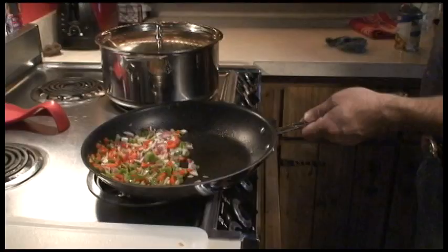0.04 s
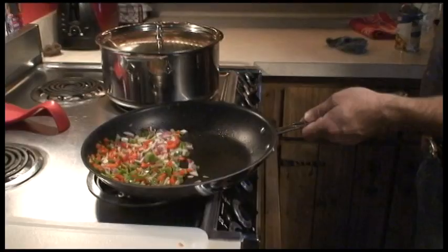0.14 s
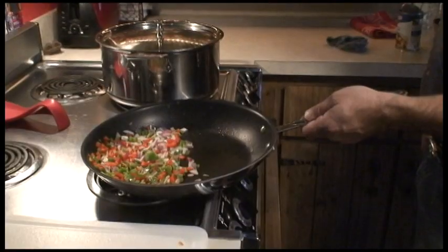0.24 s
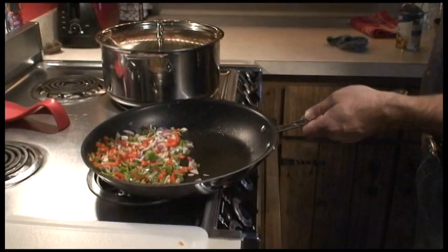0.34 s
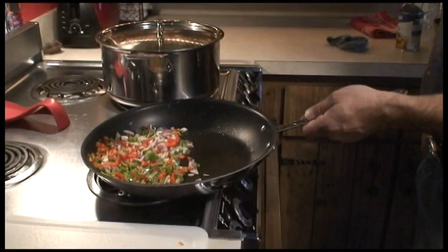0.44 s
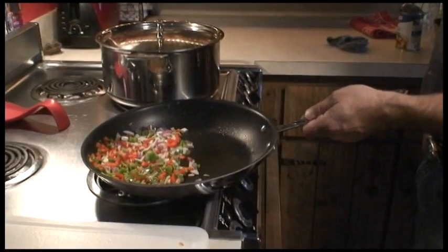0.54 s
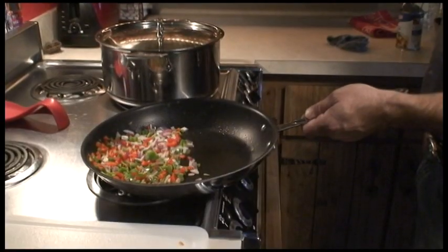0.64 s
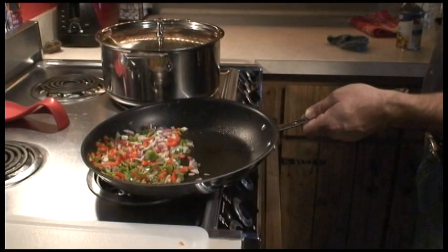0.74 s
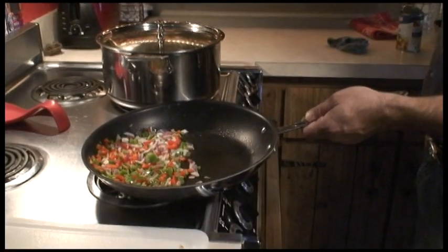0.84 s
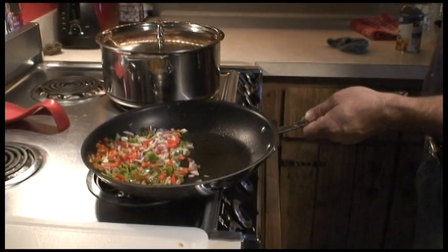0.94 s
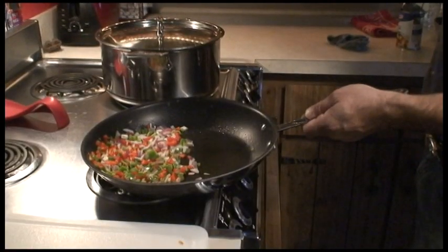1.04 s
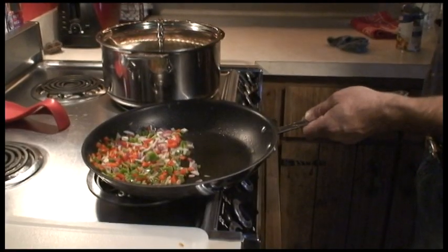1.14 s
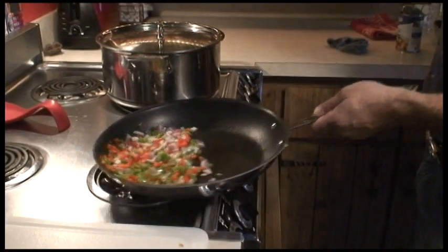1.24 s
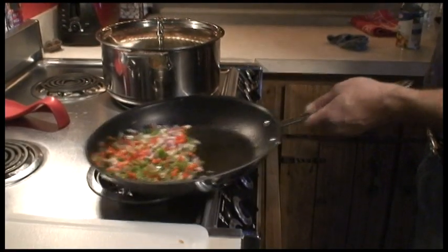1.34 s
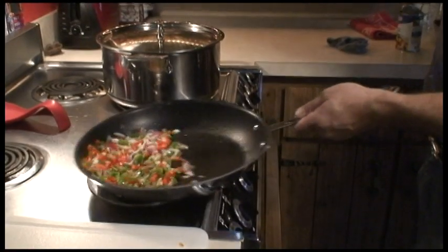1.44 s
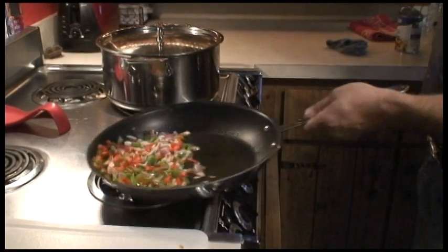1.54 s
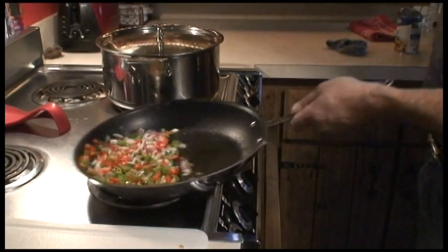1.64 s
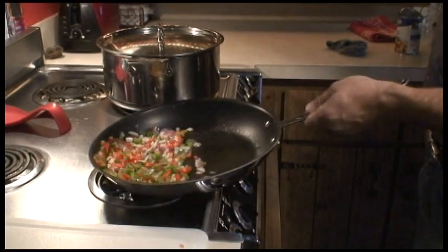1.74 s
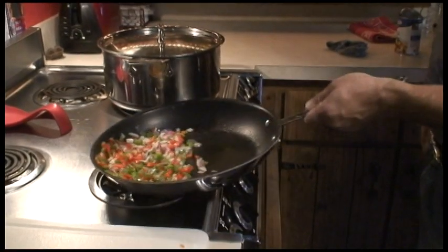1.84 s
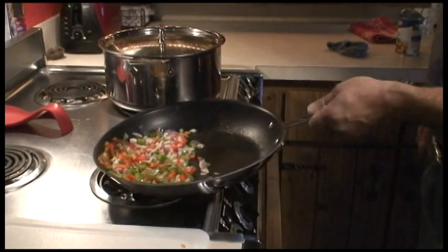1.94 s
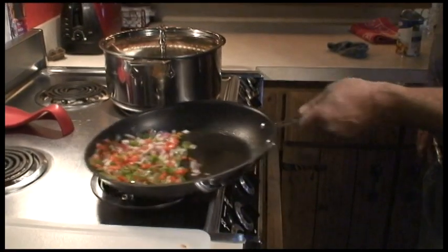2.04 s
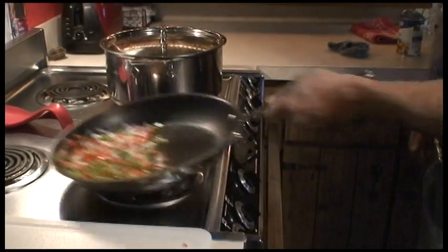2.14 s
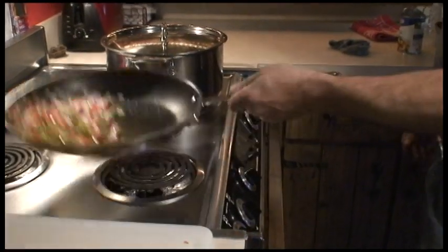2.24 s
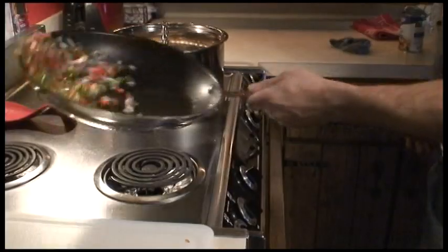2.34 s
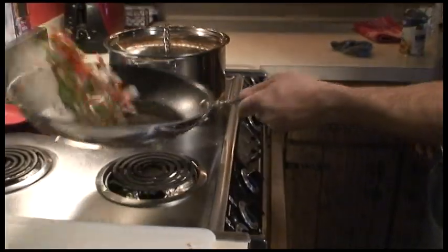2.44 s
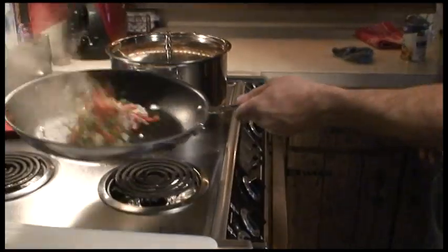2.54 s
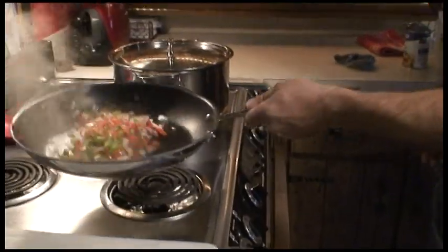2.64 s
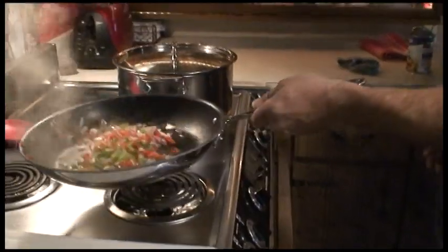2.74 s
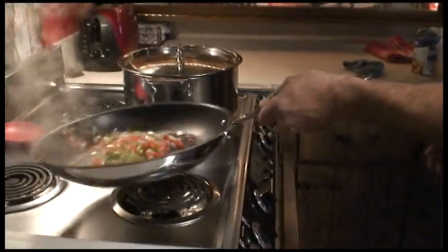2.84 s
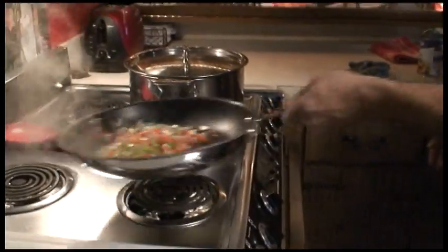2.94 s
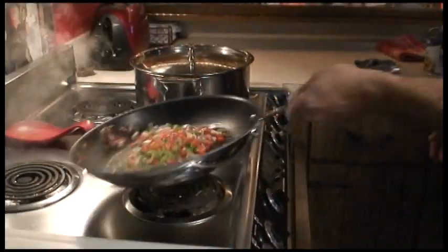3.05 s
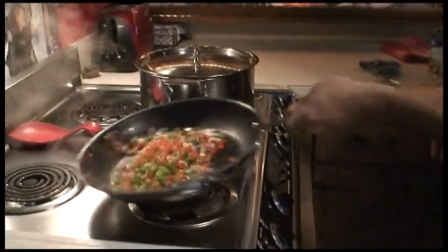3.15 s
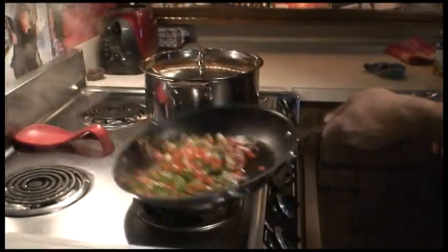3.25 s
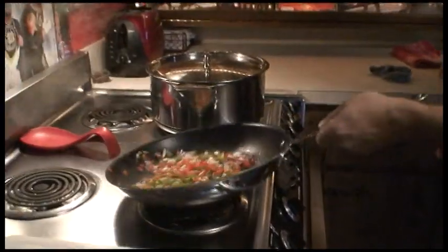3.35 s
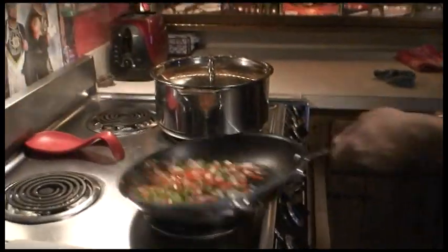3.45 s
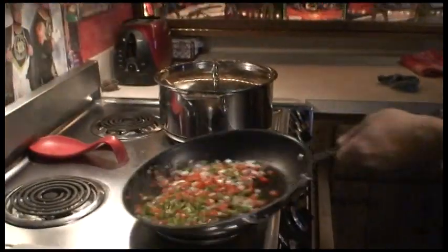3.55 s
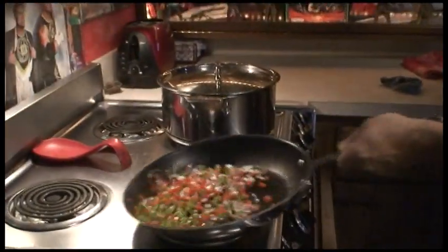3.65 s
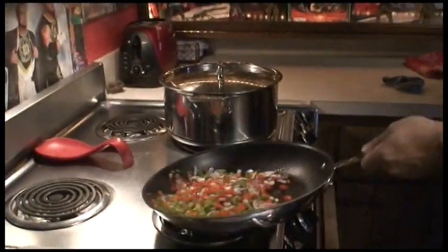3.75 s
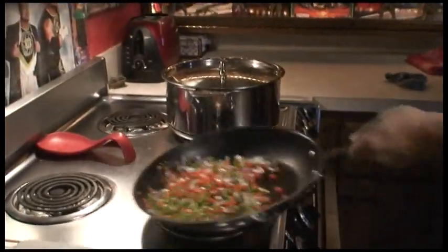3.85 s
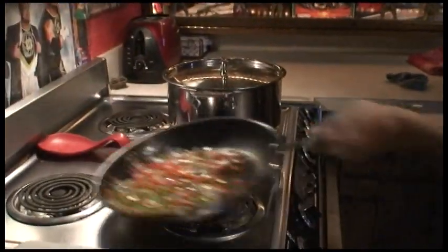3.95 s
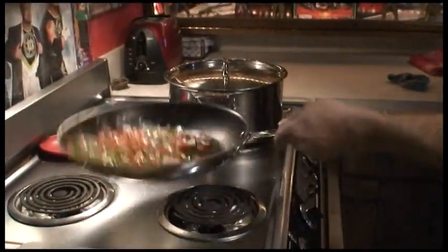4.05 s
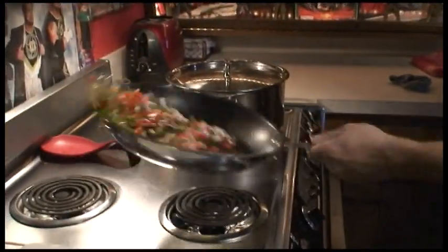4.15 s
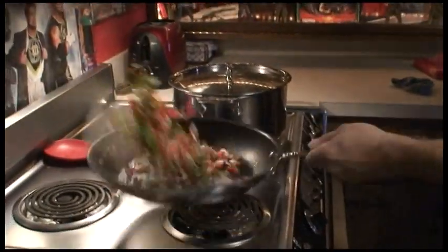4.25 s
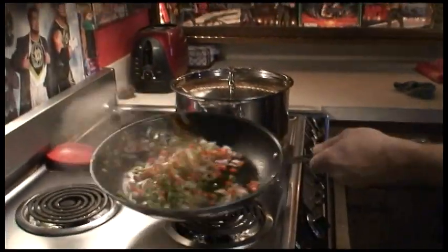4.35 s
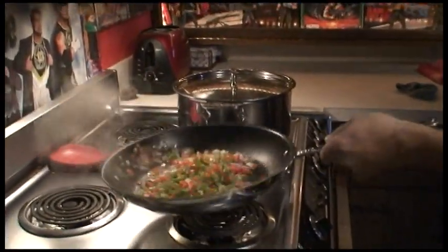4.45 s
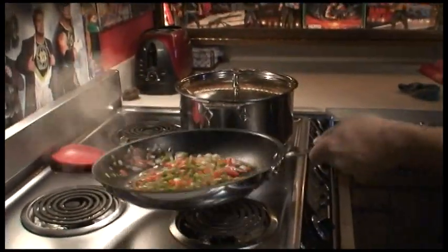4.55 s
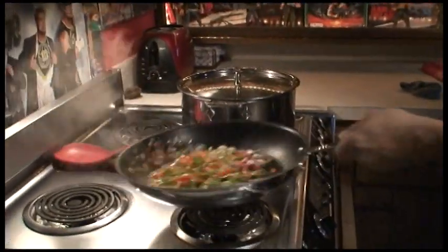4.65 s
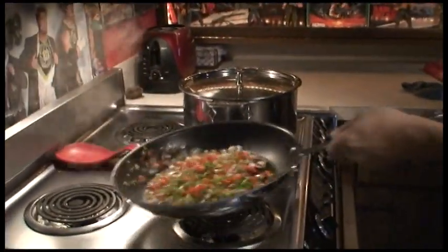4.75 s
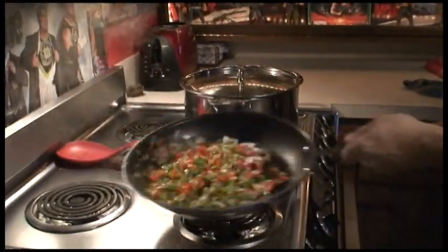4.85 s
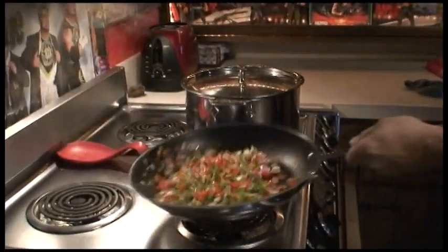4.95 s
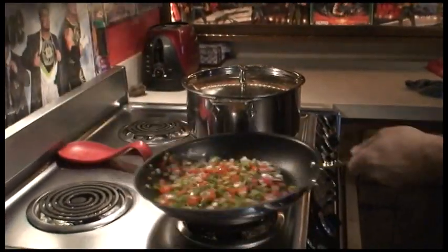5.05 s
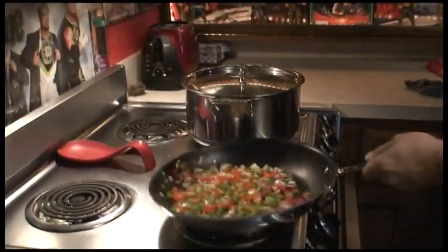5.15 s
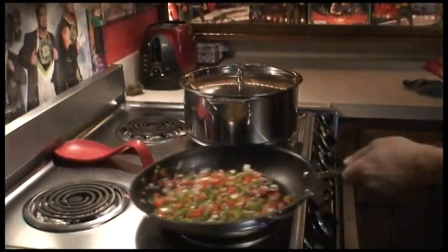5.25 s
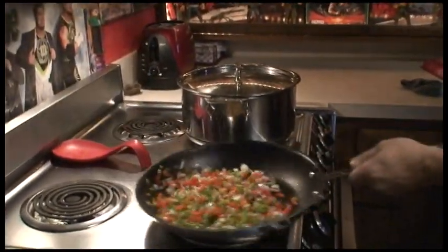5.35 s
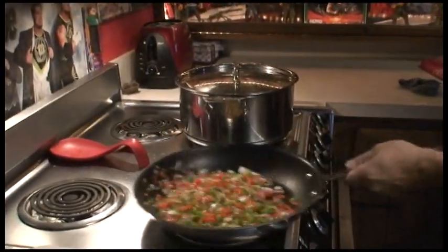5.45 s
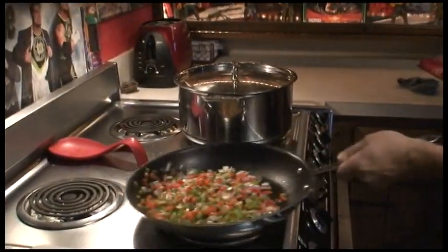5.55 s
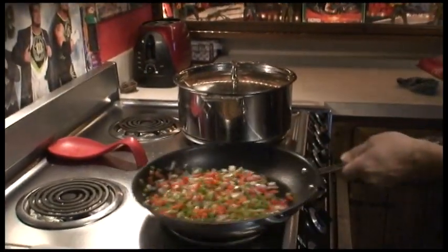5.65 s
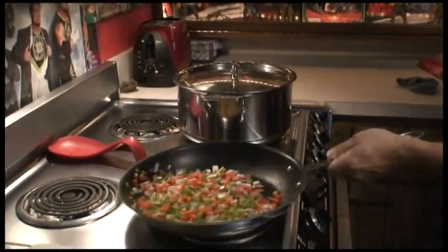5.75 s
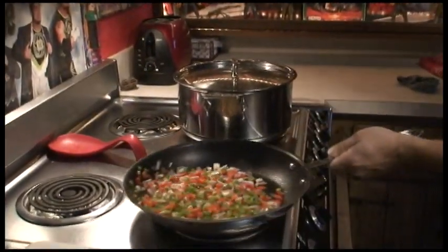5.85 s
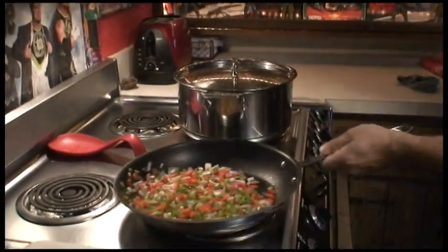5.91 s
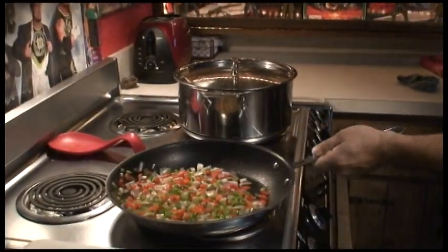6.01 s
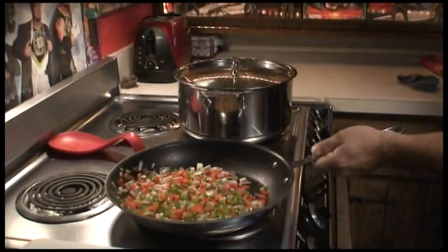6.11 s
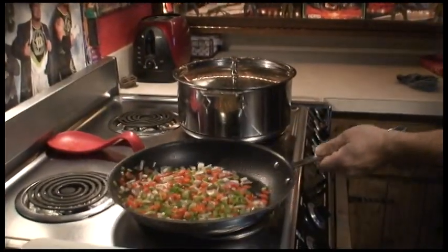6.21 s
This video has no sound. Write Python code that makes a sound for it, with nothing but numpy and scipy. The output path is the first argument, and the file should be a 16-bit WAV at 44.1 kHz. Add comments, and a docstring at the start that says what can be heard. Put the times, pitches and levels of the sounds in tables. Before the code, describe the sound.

Small kitchen, close stereo pickup with a short, dull room tail. A loud, close oil sizzle opens, with a sharp spit of fat at 0.05 seconds, and cuts off abruptly near 0.15. A quieter fine sizzle remains over low mains hum and a soft fan rush. From about 1.3 to 2.2 the skillet is shaken: irregular metallic knocks, gritty scrapes and coil chatter, with low sheet-steel booms. It lifts; after a faint slide at 2.35, food lands around 2.6 in soft, damped ringing patters, followed by wet steamy hisses at 2.85 and 2.95. The sizzle is now calmer. At 3.4 the pan clatters down brightly, rattling until 4.1. A second toss patters softly at 4.35-4.5, with tiny steam puffs afterward. At 5.3 it bangs down again, scraping and rattling until about 5.9, then a faint slide and last light ticks near 6.25.

```python
"""Shaking a skillet of vegetables

A skillet of diced vegetables is shaken on an electric coil burner and tossed twice, in a small kitchen.
The pan knocks and scrapes on the loose coil: bursts of impacts ring metal and the sheet-steel stove top.
Tossed food patters into the lifted pan as soft pushes on its ringing modes; wet slides and steam are shaped noise.
Oil sizzles throughout as countless tiny clicks, at first also from close by, over a mains hum and a fan's low rush.
"""
import sys
import numpy as np
from scipy import signal
from scipy.fft import rfft, irfft, next_fast_len
from scipy.io import wavfile

SR = 44100
rng = np.random.default_rng(int(sys.argv[2]) if len(sys.argv) > 2 else 0)


def to_wav(s):
    """Save 16-bit WAV."""
    ch = np.atleast_2d(s).T  # columns
    pcm = np.round(np.clip(ch, -1, 1) * 32767)  # PCM
    wavfile.write(sys.argv[1], SR, pcm.astype(np.int16))


N = 276948
TIME = np.arange(N) / SR
RING_TIME = TIME[:SR // 3]  # time within one short sound

# The pan strikes the coil; levels are before the trims in knocks(). clank_db is the low part against the clash.
# Columns: start_s, clash_db, clank_db, stove_thud_db, chatter_s
KNOCKS = [(1.348, -18, -8, -49, 0.0094), (1.442, -18.5, -4.5, -52, 0.012),
          (1.465, -14.5, -8.5, -37, 0.0072), (1.479, -18.5, -5, -45, 0.0086),
          (1.580, -17.5, -7, -42, 0.0085), (1.595, -20, -3, -49, 0.0084), (1.673, -18, -7, -36, 0.0052),
          (1.7721, -16.5, -7, -37, 0.01), (1.793, -15, -5.5, -45, 0.0063), (1.841, -19, -7, -50, 0.0077),
          (1.977, -17, -.5, -42, 0.0091), (2.072, -18, -2.5, -58, 0.0079), (2.157, -16.5, -2, -56, 0.0097),
          (2.186, -17, -4, -59, 0.0075), (3.3841, -17, -3.5, -35.5, 0.0068), (3.402, -19, -10, -43, 0.01),
          (3.427, -17.5, -4, -44, 0.015), (3.5668, -14.5, -5.5, -37.5, 0.0081),
          (3.637, -17, -8, -52, 0.011), (3.7422, -21.5, -6, -40, 0.0099), (3.823, -16, -4.5, -34.5, 0.0075),
          (3.898, -28.5, -1.5, -49, 0.0074), (3.921, -16, -9.5, -38, 0.0065),
          (3.943, -18.5, -6, -50, 0.0086), (4.075, -36, 0, -55, 0.0085),
          (5.2805, -18.5, -0.5, -36.5, 0.0049), (5.31, -20, -3, -46, 0.021), (5.332, -24, -10, -54, .0093),
          (5.411, -31, -0.5, -41, .01), (5.466, -20.5, -15, -46, 0.0079), (5.49, -17, -5, -42, 0.0071),
          (5.504, -19, -13, -38, 0.0067), (5.552, -16.5, -11, -46, 0.0088), (5.6791, -23, -24, -50, 0.0058),
          (5.7806, -21, -1.5, -43, 0.0072), (5.848, -35.5, 4, -44, 0.0087),
          (5.876, -28.5, -20, -44, 0.0084), (6.2555, -34, -0.5, -57, 0.0062),
          (6.2744, -31, -28, -46, 0.0054)]
# Colour of pan, coil and drip bowl together. Columns: pitch_hz, level_db
METAL_COLOUR = [(200, -19.5), (300, 2.5), (430, -5), (600, -1), (1080, 4.5), (1450, 3), (2000, 0.5),
                (3400, -0.5), (4400, 0.5), (5100, 3.5), (5900, -1), (8100, -8.5), (11000, -19),
                (16000, -33.5)]
# Their clearest ringing tones; ring_s is the time to fade by 60 dB. Columns: pitch_hz, level_db, ring_s
COIL_MODES = [(408.6, -8.5, 0.28), (493, -3, 0.12), (556, 3, 0.093), (702, 3.5, 0.067), (856, -1.5, 0.24),
              (1036, 5.5, 0.083), (1980, 6, 0.04), (2525, -4, 0.41), (3180, -15, 0.24), (4170, -5, 0.033),
              (4504, 10, 0.05), (4895, 8.5, 0.022), (5200, 6, 0.079), (5330, -10, 0.15), (6160, -30, 0.11)]
# Ringing tones of the sheet-steel stove top. Columns: pitch_hz, level_db, ring_s
STOVE_MODES = [(137, -20.5, 0.21), (161.7, -3, 0.26), (178, -3, 0.093), (218.5, 2.5, 0.091),
               (245.8, -10, 0.16)]
STOVE_LOW_HZ = 152  # low cutoff of the stove top's boom; the dull thud is made separately
# A harder blow is brighter: extra edge for each dB above a firm blow
FIRM_BLOW_DB, EDGE_PER_DB = -18, 0.8
# The pan is set back on the burner, edge first; blows are brighter while it settles. Column: start_s
SET_DOWNS_S = [3.37, 5.27]
SETTLE_S, SET_DOWN_BRIGHT_DB = 0.12, 12.5

# Strokes of the pan across the coil; levels are before the trims in shaking().
# Columns: start_s, length_s, scrape_db, stove_boom_db
STROKES = [(1.335, 0.043, -23.5, -31), (1.46, 0.2, -25.5, -27.5), (1.685, 0.031, -24, -33),
           (1.78, 0.057, -24, -27.5), (1.985, 0.0083, -27, -30.5), (2.085, 0.09, -32, -25),
           (3.395, 0.15, -25.5, -34), (3.58, 0.086, -22.5, -30.5), (3.75, 0.021, -27.5, -30),
           (3.835, 0.016, -29, -27), (3.93, 0.041, -28.5, -31.5), (5.295, 0.12, -20.5, -26),
           (5.49, 0.065, -24, -41), (5.62, 0.13, -31, -33.5), (5.79, 0.081, -32.5, -34),
           (5.99, 0.15, -40, -49)]
STROKE_RISE_DB_PER_S = 1100
FIRST_RISE_DB_PER_S = 308  # the first stroke starts from rest and swells slowly
SCRAPE_FALL_DB_PER_S, GRIND_FALL_DB_PER_S, BOOM_FALL_DB_PER_S = 210, 112, 145
GRIND_DB = -6.5  # low grinding, relative to the scrape level in the table

# Clumps of food land in the lifted pan; a lower corner means a softer contact. Columns: start_s, level_db, corner_hz
LANDINGS = [(2.572, -33.5, 1400), (2.597, -25, 3200), (2.609, -31.5, 800), (2.643, -31, 1700),
            (2.706, -43.5, 900), (4.351, -34, 1100), (4.364, -32.5, 800), (4.382, -33, 1100),
            (4.399, -30.5, 1200), (4.423, -33, 750), (4.440, -37.5, 1000), (4.494, -33.5, 640)]
# Ringing tones of the lifted pan, damped by the food. Columns: pitch_hz, level_db, ring_s
PAN_MODES = [(569.3, 1.5, 0.13), (676, -3, 0.098), (1058, 6.5, 0.065), (1165, -3.5, 0.058),
             (1657, 2.5, 0.037), (2065, -2.5, 0.09), (2900, -6, .04)]
# Colour of wet food meeting the pan. Columns: pitch_hz, level_db
SPLAT_COLOUR = [(250, -33), (700, -44), (2500, 15.5), (7000, 8), (16000, -12)]

# Slides: wet food over bare hot metal, and a last light slide near 6 s. Columns: start_s, length_s, hiss_db,
# rub_db
SLIDES = [(2.338, 0.04, -45.5, -53), (2.852, 0.064, -33.5, -36.5), (2.947, 0.059, -40, -66),
          (5.98, 0.068, -44.5, -51)]
SLIDE_RISE_DB_PER_S, SLIDE_FALL_DB_PER_S = 380, 250
# Colour of the sliding food's steam. Columns: pitch_hz, level_db
HISS_COLOUR = [(2500, -15.5), (3730, -18), (4470, 1), (5140, 2), (6130, -6.5), (7200, -2), (8880, -16.5),
               (11100, -17), (16000, -28)]
# Colour of its soft rubbing. Columns: pitch_hz, level_db
RUB_COLOUR = [(180, -28), (300, -16), (480, -2.5), (850, -3.5), (1200, -4), (2200, -12.5), (4500, -38)]
# Small puffs of steam as pieces shift onto hot metal. Columns: middle_s, level_db
PUFFS = [(2.48, -49), (3.09, -48), (4.28, -54), (4.78, -52), (4.89, -53), (4.98, -54.5), (5.265, -53)]

# Colour of the oil's sizzle. Columns: pitch_hz, level_db
SIZZLE_COLOUR = [(400, -17), (700, -5), (1060, 5), (1400, -8), (2000, 1.5), (3100, 4.5), (3700, 0.5),
                 (5100, 7.5), (7300, 3), (11000, -8.5), (16000, -22)]
# The food is tossed; the sizzle dips while it is in the air. Column: middle_s
TOSSES_S = [2.62, 4.32]
AIRBORNE_S, AIRBORNE_DIP_DB = 0.22, -3
# The sizzle calms over the last stretch before the middle of the first toss
HOT_SIZZLE_DB, TURNED_SIZZLE_DB, COOLING_S = -43, -52, 0.51
# Colour of frying heard from close by. Columns: pitch_hz, level_db
CLOSE_COLOUR = [(400, -33), (700, -18), (906, -9.5), (1100, -17), (1400, -15), (2900, -8.5), (3900, -9.5),
                (4900, -5), (7000, -5.5), (10500, -13), (16000, -22.5)]
CLOSE_END_S, CLOSE_DB = 0.145, -26
SPIT_S, SPIT_PEAK_DB = 0.0472, -4  # one spit of fat

# Colour of a fan's low rush. Columns: pitch_hz, level_db
FAN_COLOUR = [(20, -10), (45, -8.5), (78, -11), (140, -11.5), (185, -2), (233, 1), (280, -6), (330, -9),
              (450, -12), (600, -8), (1000, -16), (1600, -17), (3300, -39.5)]
# Steady tones of the mains hum. Columns: pitch_hz, level_db
HUM = [(120, -59.5), (240, -56), (300, -61.5), (360, -64.5), (598, -70.5)]
# The microphone pair: left-right difference in the room tail, left over right level, left's lead in phase.
# Columns: pitch_hz, side_db, left_minus_right_db, left_lead_radians
PORTS = [(50, -12, -0.5, 0.42), (150, -42.5, -1, 0.2), (400, -13, 0.5, 0.31), (1320, -7.5, 1.5, 0.46),
         (4230, -7.5, 2.5, 0.41), (5650, 1.5, 2.5, -0.59), (8500, -8, -3.5, -1.62), (9900, 7, -1, 0.96),
         (11900, -3, 1, 0)]
TOP_HZ = 16000  # the recorder passes nothing much above this


def knocks(clash_trim_db=-4, clank_trim_db=-4, edge_db=-14, bounce_db=-13, boom_db=-22, thud_trim_db=1,
           thud_ring_s=0.052):
    """Each blow makes the loose coil chatter and the stove thud; a glancing blow is mostly chatter."""
    out = np.zeros(N)
    for s, db, clank_db, thud_db, chatter_s in KNOCKS:
        glancing = (chatter_s / 0.008) ** 2
        edge = edge_db + EDGE_PER_DB * (db - FIRM_BLOW_DB) + SET_DOWN_BRIGHT_DB * on_edge(s)
        bounces = clicks(rate=2200, spread_db=2, size=len(RING_TIME))
        bounces = bounces * np.exp(-(RING_TIME / chatter_s / 2.2) ** 2)
        contacts = undb(bounce_db) * glancing * bounces * (1 - np.exp(-RING_TIME / (0.2 * chatter_s)))
        contacts[0] = 1  # the blow itself
        blow = signal.fftconvolve(contacts, metal_response())[:len(RING_TIME)]
        # the low clank, the middle clash and the bright edge have their own levels
        add(out, s, attack_level(band(blow, 232, 1580), db + clank_db + clank_trim_db))
        add(out, s, attack_level(band(blow, 1138, 5900), db + clash_trim_db))
        add(out, s, attack_level(band(blow, 7960, 21800), db + edge))
        # the stove top booms along, and the heavy frame below it gives a dull thud
        boom = band(ring(STOVE_MODES, scatter_db=0.5), STOVE_LOW_HZ, SR / 2)
        add(out, s, attack_level(boom, db + boom_db))
        rumble = band(rng.standard_normal(len(blow)), 12, 90, order=2)
        frame = rumble * undb(-60 * RING_TIME / thud_ring_s)
        add(out, s, attack_level(frame, thud_db + thud_trim_db))
    return out


def shaking(scrape_trim_db=-1.5, boom_trim_db=-4, ticks_db=-4, edge_db=-10):
    """In each stroke the pan base rattles the coil and drums unevenly on the stove top."""
    metal = unit(rasp()) + undb(ticks_db) * unit(rasp(rate=25, spread_db=1.5, count=3))
    scrape = unit(band(metal, 1590, 10500, order=2))
    grind = unit(band(metal, 300, 1047))
    scrape = scrape + undb(edge_db) * on_edge(TIME) * unit(band(metal, 15000, 20000))
    drum_hits = clicks(rate=400, spread_db=1)
    drumming = signal.oaconvolve(drum_hits, ring(STOVE_MODES, scatter_db=0))[:N]
    boom = unit(band(drumming, STOVE_LOW_HZ, SR / 2))
    scraping = grinding = booming = 0
    # where strokes overlap, the stronger one counts
    for k, (s, length, db, boom_db) in enumerate(STROKES):
        rise = STROKE_RISE_DB_PER_S if k else FIRST_RISE_DB_PER_S
        scrape_gain = undb(db + scrape_trim_db) * swell(s, length, rise, SCRAPE_FALL_DB_PER_S)
        grind_gain = undb(db + GRIND_DB) * swell(s, length, rise, GRIND_FALL_DB_PER_S)
        boom_gain = undb(boom_db + boom_trim_db) * swell(s, length, rise, BOOM_FALL_DB_PER_S)
        scraping = np.maximum(scraping, scrape_gain)
        grinding = np.maximum(grinding, grind_gain)
        booming = np.maximum(booming, boom_gain)
    return (scrape * scraping + grind * grinding + boom * booming) * contact()


def rasp(rate=350, spread_db=4.5, count=10):
    """Stick-slip at several points of contact, each ringing the metal in its own way."""
    return sum(signal.oaconvolve(clicks(rate, spread_db), metal_response())[:N] for _ in range(count))


def contact(lift_s=0.0098):
    """The pan rides up just before each sharp blow, which eases the scraping."""
    pressure = np.ones(N)
    for s, *_, chatter_s in KNOCKS:
        if chatter_s < 0.01:  # little chatter means a sharp blow
            pressure *= 1 - 0.5 * np.exp(-((TIME - s + lift_s / 2) / lift_s) ** 2)
    return pressure


def on_edge(t):
    """How far the pan still rides on its edge after being set down, from 0 to about 1."""
    return sum((t > down) * np.exp(-np.abs(t - down) / SETTLE_S) for down in SET_DOWNS_S)


def metal_response(crack_ring_s=0.037, tail_ring_s=0.22, tail_db=-16, modes_db=-9):
    """One contact of pan and coil: a crack, a wash of crowded tones and a few clear ones."""
    fade = undb(-60 * RING_TIME / crack_ring_s) + undb(tail_db - 60 * RING_TIME / tail_ring_s)
    crowded = colour(rng.standard_normal(len(fade)) * fade, METAL_COLOUR)
    return unit(crowded) + undb(modes_db) * unit(ring(COIL_MODES, scatter_db=3))


def landings(patter_s=0.021, scatter=0.3, splat_db=-19, splat_ring_s=0.26):
    """Soft clumps push on the lifted pan and ring its low modes, each with a small wet splat."""
    out = np.zeros(N)
    for s, db, soft_hz in LANDINGS:
        arrival = np.exp(-(RING_TIME / patter_s) ** 2)
        tone = 0
        for hz, mode_db, ring_s in PAN_MODES:
            # the ring builds up while the clump settles; a softer contact reaches fewer high modes
            build_up = np.cumsum(arrival) * undb(-60 * RING_TIME / ring_s)
            jitter = arrival * rng.standard_normal(len(arrival))
            wander = scatter * np.cumsum(jitter) / np.sqrt(patter_s * SR)  # in cycles
            mode = build_up * np.sin(2 * np.pi * (hz * RING_TIME + wander + rng.random()))
            tone = tone + attack_level(mode, mode_db) / np.sqrt(1 + (hz / soft_hz) ** 4)
        add(out, s, attack_level(tone, db))
        splat = colour(rng.standard_normal(len(arrival)), SPLAT_COLOUR) * undb(-60 * RING_TIME / splat_ring_s)
        add(out, s, attack_level(splat, db + splat_db))
    return out


def sliding():
    """Each slide rubs softly and flares into a hiss like steam."""
    steam = sizzle(HISS_COLOUR, rate=12000, spread_db=1)
    rub = sizzle(RUB_COLOUR, rate=3700, spread_db=3.5)
    out = np.zeros(N)
    for s, length, hiss_db, rub_db in SLIDES:
        slide = undb(hiss_db) * steam + undb(rub_db) * rub
        out += slide * swell(s, length, SLIDE_RISE_DB_PER_S, SLIDE_FALL_DB_PER_S)
    return out


def puffs(length_s=0.011, lo_hz=4600, hi_hz=5600):
    """Each puff of steam swells and dies as a narrow hiss."""
    steam = unit(band(rng.standard_normal(N), lo_hz, hi_hz, order=2))
    return steam * sum(undb(db) * np.exp(-((TIME - s) / length_s) ** 2 / 2) for s, db in PUFFS)


def frying(pops_db=-11):
    """Steady sizzle with sparser pops; it calms as the cool side of the food is turned down."""
    bubbles = sizzle(SIZZLE_COLOUR, rate=7000, spread_db=-1)
    bubbles = bubbles + undb(pops_db) * sizzle(SIZZLE_COLOUR, rate=51, spread_db=-0.5)
    turning_s = [TOSSES_S[0] - COOLING_S, TOSSES_S[0]]
    heat_db = np.interp(TIME, turning_s, [HOT_SIZZLE_DB, TURNED_SIZZLE_DB])
    airborne = sum(np.exp(-((TIME - s) / AIRBORNE_S) ** 2) for s in TOSSES_S)
    return bubbles * undb(heat_db + AIRBORNE_DIP_DB * airborne)


def close_frying():
    """The same pan from close by: a louder sizzle of bubbles, with a spit of fat as one filtered click."""
    out = sizzle(CLOSE_COLOUR, rate=14000, spread_db=2.5) * undb(CLOSE_DB)
    spit = colour(signal.unit_impulse(len(RING_TIME)), CLOSE_COLOUR)
    add(out, SPIT_S, undb(SPIT_PEAK_DB) * spit / np.abs(spit).max())
    return out


def sizzle(points, rate, spread_db):
    """Steam bubbles burst in the oil as random clicks, coloured and scaled to rms 1."""
    return unit(colour(clicks(rate, spread_db), points))


def fan(early_db=-44.5, late_db=-47):
    """The low rush of a fan is coloured noise, a little stronger at first."""
    rush = unit(colour(rng.standard_normal(N), FAN_COLOUR))
    return rush * undb(np.interp(TIME, [2.4, 4.3], [early_db, late_db]))


def hum():
    """Mains hum is a few steady sine tones, with levels given as rms."""
    return sum(undb(db) * np.sqrt(2) * np.sin(2 * np.pi * (hz * TIME + rng.random())) for hz, db in HUM)


def kitchen(x, room_db=-9, ring_s=0.41, treble_hz=7000):
    """Direct sound plus a short, duller room tail, picked up by two close microphone ports."""
    fade = undb(-60 * RING_TIME / ring_s) * (1 - np.exp(-RING_TIME / 0.00079))
    duller = signal.butter(1, treble_hz, fs=SR, output="sos")
    tails = signal.sosfilt(duller, rng.standard_normal((2, len(fade)))) * fade
    size = next_fast_len(N + len(fade))
    tails = rfft(tails, size)
    grid = np.maximum(np.arange(tails.shape[1]) * SR / size, 1)
    tails *= undb(room_db) / np.sqrt(np.mean(np.abs(tails[:, grid < 5000]) ** 2))
    hz, *columns = np.transpose(PORTS)
    side_db, balance_db, lead = (np.interp(np.log(grid), np.log(hz), c) for c in columns)
    sign = np.array([[1], [-1]])  # left, right
    ports = undb(sign * balance_db / 2) * np.exp(1j * sign * lead / 2)
    room = 1 + tails[0] + sign * undb(side_db) * tails[1]
    return irfft(rfft(x, size) * room * ports, size)[:, :N]


def undb(db):
    """Decibels to gain."""
    return 10 ** (np.asarray(db) / 20)


def unit(x):
    """Scale to rms 1."""
    return x / np.sqrt(np.mean(x ** 2))


def band(x, lo_hz, hi_hz, order=3):
    """Keep only the sound between two pitches."""
    sos = signal.butter(order, [lo_hz, min(hi_hz, SR / 2 - 1)], "band", fs=SR, output="sos")
    return signal.sosfilt(sos, x)


def colour(x, points, size=4096):
    """Filter through (pitch_hz, level_db) points without pre-echo (minimum phase, from the cepstrum)."""
    hz, db = np.transpose(points)
    grid = np.maximum(np.fft.rfftfreq(size, 1 / SR), 1)
    cepstrum = irfft(np.log(undb(np.interp(np.log(grid), np.log(hz), db))))
    cepstrum[1:size // 2] *= 2
    cepstrum[size // 2 + 1:] = 0
    return signal.fftconvolve(x, irfft(np.exp(rfft(cepstrum))))[:len(x)]


def clicks(rate, spread_db, size=N):
    """Random tiny impacts, rate a second; a positive spread makes many small and a few large."""
    strength = undb(spread_db * np.minimum(rng.exponential(size=size), 4))
    return (rng.random(size) < rate / SR) * strength * rng.choice([-1, 1], size)


def ring(modes, scatter_db):
    """Fading tones after one blow; each contact point weights them differently."""
    hz, db, ring_s = np.transpose(modes)[:, :, None]
    weight = undb(db + scatter_db * rng.standard_normal(db.shape)) * rng.choice([-1, 1], db.shape)
    fade = np.exp(-np.log(1000) * RING_TIME / ring_s)
    return np.sum(weight * np.sin(2 * np.pi * hz * RING_TIME) * fade, axis=0)


def attack_level(x, db):
    """Scale a blow so that its first 20 ms have the given rms."""
    return x * undb(db) / np.sqrt(np.mean(x[:SR // 50] ** 2))


def swell(start_s, length_s, rise, fall):
    """Gain that rises, holds at 1 and falls; slopes in dB a second."""
    early = np.maximum(start_s - TIME, 0)
    late = np.maximum(TIME - start_s - length_s, 0)
    return undb(np.maximum(-rise * early - fall * late, -200))


def add(track, s, x):
    """Mix x into the track at time s."""
    start = int(s * SR)
    track[start:start + len(x)] += x[:N - start]


def scene():
    """All sounds together; the close frying ends abruptly, and the hum bypasses the room."""
    close = kitchen(close_frying(), room_db=-11) * (TIME < CLOSE_END_S)
    pan = knocks() + shaking() + landings()
    food = sliding() + puffs() + frying()
    return close + kitchen(pan + food + fan()) + hum()


def record(dry):
    """The recorder cuts the top with a steep low-pass filter."""
    return signal.sosfilt(signal.ellip(10, 0.2, 70, TOP_HZ, fs=SR, output="sos"), dry)


dry = scene()
out = record(dry)
to_wav(out)
```